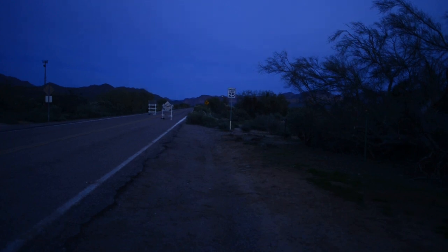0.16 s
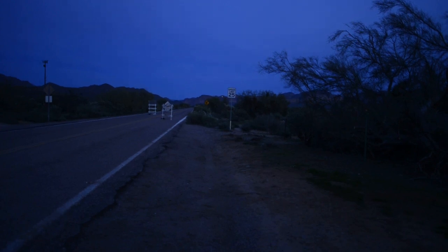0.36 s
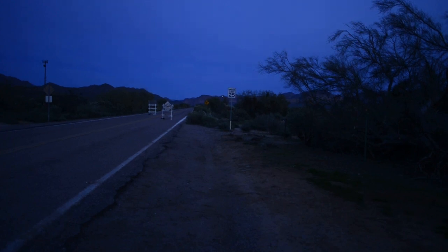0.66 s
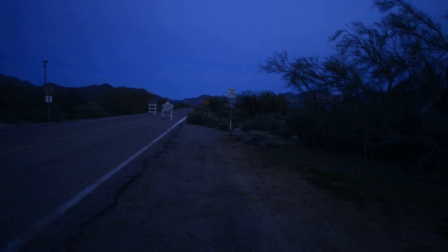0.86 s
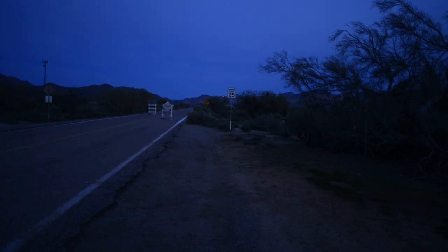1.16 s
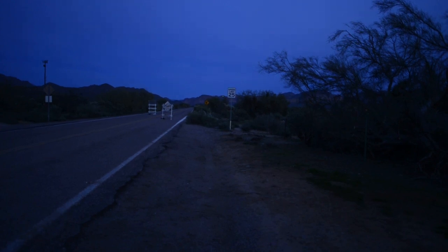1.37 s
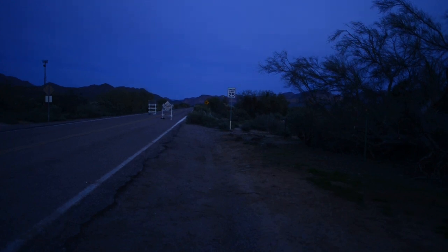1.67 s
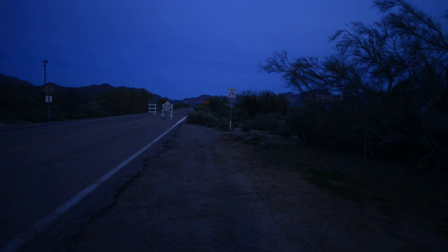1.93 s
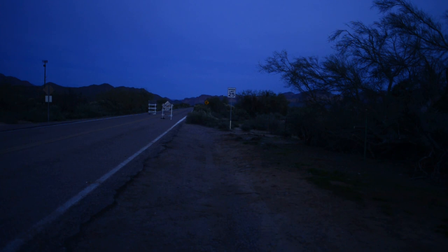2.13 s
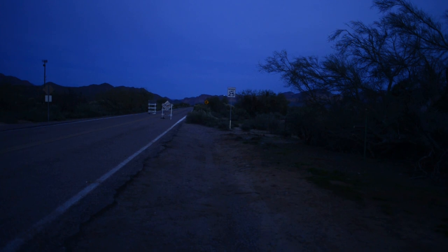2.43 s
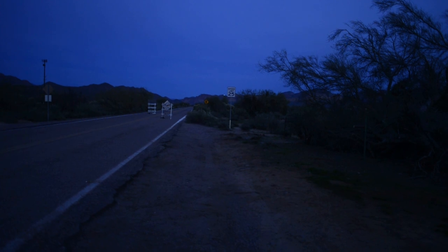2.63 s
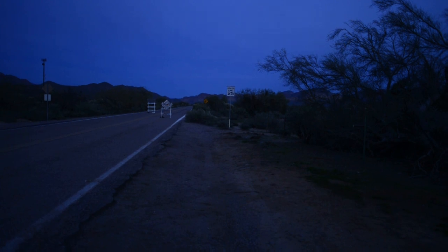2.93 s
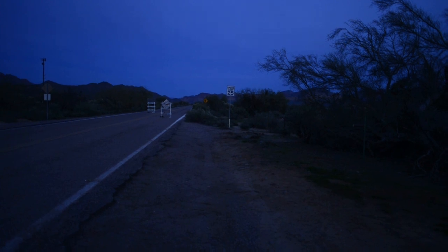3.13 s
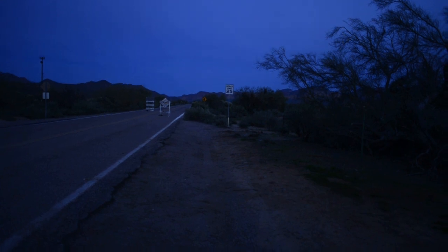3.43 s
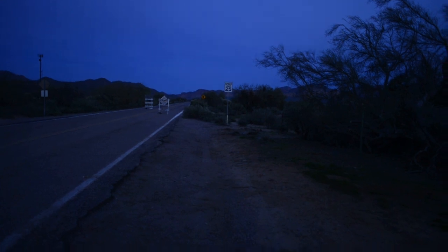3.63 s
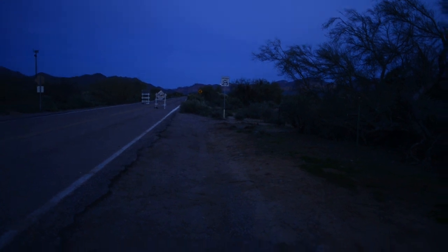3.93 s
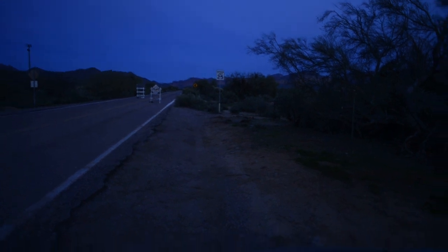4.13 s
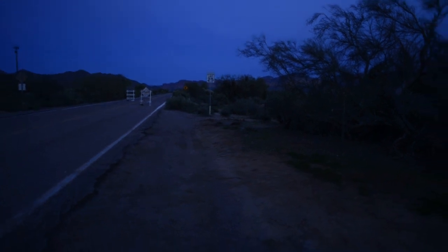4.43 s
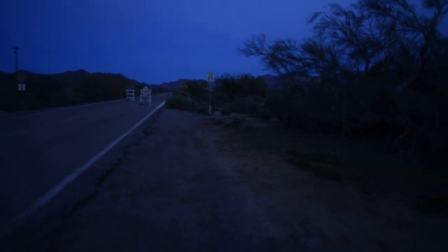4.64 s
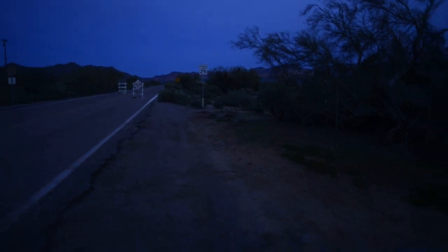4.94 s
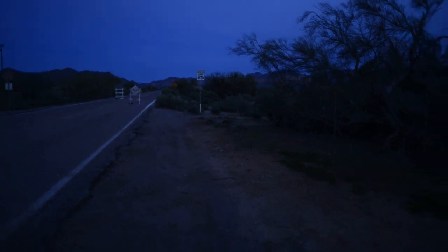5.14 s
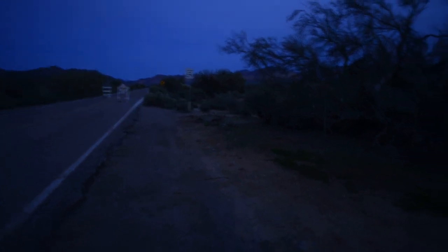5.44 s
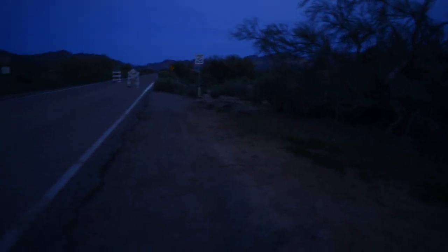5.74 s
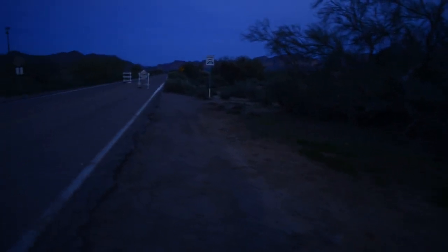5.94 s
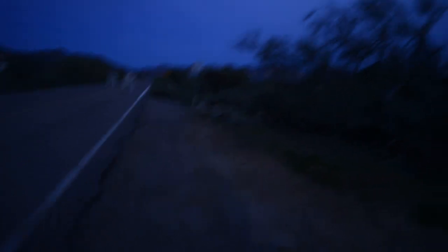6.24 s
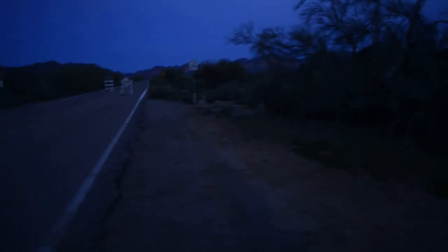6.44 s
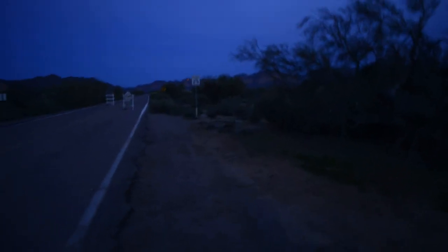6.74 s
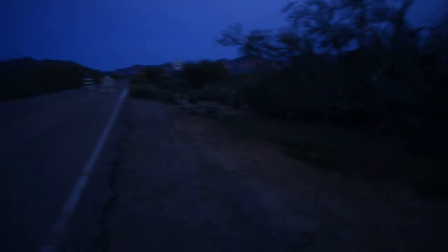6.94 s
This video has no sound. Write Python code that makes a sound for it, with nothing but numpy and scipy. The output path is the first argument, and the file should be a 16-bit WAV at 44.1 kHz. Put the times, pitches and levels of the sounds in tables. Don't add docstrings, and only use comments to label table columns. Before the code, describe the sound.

On a quiet desert roadside at dusk, over soft hiss and a far engine's low hum, a coyote some way off yips twice and breaks into a high, nearly pure, slowly sagging howl of about a second. Faint echoes return from hills. Then very close fingers rub, squeak and rattle the camera's plastic shell, with sharp clicks and one harsh clipped snap.

```python
import sys
import numpy as np
from scipy import signal
from scipy.fft import rfft, irfft, next_fast_len
from scipy.io import wavfile
from scipy.ndimage import uniform_filter1d, map_coordinates

SR = 44100
rng = np.random.default_rng(int(sys.argv[2]) if len(sys.argv) > 2 else 0)


def makeup_ratio(level_db):
    decades = np.asarray(level_db, float) / 20
    return 10 ** decades


def put_to_file(sound):
    columns = np.atleast_2d(sound).T
    safe = np.clip(columns, -1, 1)
    whole_steps = np.round(safe * 32767)
    wavfile.write(sys.argv[1], SR, whole_steps.astype(np.int16))


N = 312943
TIME = np.arange(N) / SR

# [t/s, f/Hz, level/dB]
FIRST_YIP = [
    (1.655, 535, -60),
    (1.666, 555, -31.5),
    (1.69, 584, -25),
    (1.702, 623, -29),
    (1.725, 653, -28.5),
    (1.746, 630, -26),
    (1.75, 700, -38),
    (1.765, 617, -36.5),
    (1.785, 583, -53.5),
]
# [t/s, f/Hz, level/dB]
SECOND_YIP = [
    (1.855, 434, -52.5),
    (1.875, 573, -28),
    (1.889, 614.5, -28.5),
    (1.93, 696, -33.5),
    (1.955, 673, -31),
    (2.005, 650, -35.5),
    (2.036, 714, -26),
    (2.043, 744, -31),
    (2.052, 960, -42.5),
]
# [t/s, f/Hz, level/dB]
HOWL_LEAP = [
    (2.039, 848, -51.5),
    (2.049, 1150, -24),
    (2.066, 1175, -24.5),
    (2.095, 1118, -25.5),
    (2.112, 1010, -34),
    (2.128, 1040, -34),
    (2.137, 1119, -20),
    (2.176, 1186, -21),
]
# [t/s, f/Hz, level/dB]
HOWL_HOLD = [
    (2.21, 1180, -22),
    (2.279, 1156, -22.5),
    (2.308, 1173, -21.5),
    (2.45, 1158, -24.5),
    (2.56, 1141, -21.5),
    (2.6, 1150, -21.5),
    (2.721, 1127, -23),
    (2.9, 1135, -26.5),
    (2.952, 1096, -24.5),
]
# [t/s, f/Hz, level/dB]
CRACK = [
    (2.947, 1089, -60),
    (2.957, 914, -46.5),
    (2.967, 795, -34.5),
    (2.977, 659, -42.5),
    (2.988, 700, -43),
    (3.0, 680, -62),
]
# [t/s, level/dB, half width/s]
CALL_DIPS = [(1.697, -2, 0.0055), (1.911, -1.5, 0.0072), (1.946, 1, 0.014), (1.969, -5, 0.0041),
             (1.979, 0, .008), (2.015, -6.5, 0.0072), (2.057, 4.5, 0.008), (2.1, -10, .003),
             (2.111, -5.5, 0.0035), (2.146, -2.5, 0.0044), (2.168, -2.5, 0.0072), (2.44, -3.5, 0.028),
             (2.525, 3, 0.013), (2.548, -2.5, 0.01), (2.928, -15, 0.009)]
# [t/s, level/dB, half width/s]
OCTAVE_DIPS = [(2.184, -7, 0.0088), (2.24, -2, .008), (2.325, -8, .035), (2.44, 6, 0.031),
               (2.502, -11.5, 0.011), (2.584, -4.5, 0.018), (2.686, -8.5, 0.02), (2.726, -12.5, .007),
               (2.78, -8.5, .012), (2.86, 6, 0.05)]
# [delay t/s, level/dB]
ROCK_SLAP = [
    (.094, -9),
]


def coyotes():
    yip_db = [-11.5, -0.5, -25.5, -31]
    yip = dict(breath_db=-21, waver_db=(2.5, 1.2), lift=0.0527)
    first = voice(FIRST_YIP, jitter=.016, hoarse_db=-17, overtone=(7, 6), bark_lag=.02,
                  shape_db=yip_db + [-40, -56], **yip)
    sixth_db = -8 - 150 * np.abs(TIME - 2.04)
    second = voice(SECOND_YIP, jitter=.008, hoarse_db=-20, overtone=(6, sixth_db), shape_db=yip_db, **yip)
    fourth_db = -23 - 28 * np.abs(TIME - 2.72)
    octave_db = -20 + 20 * np.log10(faltering(OCTAVE_DIPS))
    howl = voice(HOWL_LEAP + HOWL_HOLD, jitter=.0008, hoarse_db=-44, overtone=(4, fourth_db),
                 shape_db=[0.25, octave_db], waver_db=(.5, 1))
    crack = voice(CRACK, jitter=.012, hoarse_db=-10, overtone=(3, -20), breath_db=-18, shape_db=[-5, -0.5])
    slap = sum(makeup_ratio(db) * dulled(np.roll(crack, round(delay * SR)), 960) for delay, db in ROCK_SLAP)
    return faltering(CALL_DIPS) * (first + second + howl) + crack + slap


def voice(rows, jitter, hoarse_db, overtone=(2, -40), breath_db=-90, shape_db=(0,), waver_db=(0, 0),
          lift=0, bark_lag=0):
    hz, level_db = curves(rows)
    bark_db = 14 * np.exp(-np.abs(TIME - rows[1][0] - bark_lag) / 0.016)
    partials_db = []
    for k, db in enumerate(shape_db):
        waver = waver_db[k > 0] * wobble(30.03)
        partials_db.append(level_db + db + (k > 1) * bark_db + waver)
    partials_db[0] = partials_db[0] + lift * (hz - 620)
    phase = 2 * np.pi * np.cumsum(hz * (1 + jitter * wobble(120))) / SR
    shimmer = 1 + makeup_ratio(hoarse_db) * wobble(350)
    tone = sum(makeup_ratio(db) * np.sin((k + 1) * phase) for k, db in enumerate(partials_db))
    order, over_db = overtone
    tone = tone + makeup_ratio(partials_db[-1] + over_db) * np.sin(order * phase)
    throat = resonate(rng.standard_normal(N), [(1440, 970, -3.0), (2230, 430, -8.5)])
    puffs = 1 + np.cos(phase)
    breath = makeup_ratio(level_db + breath_db) * puffs * unit(dulled(throat, 1900))
    return during(rows) * (shimmer * np.sqrt(2) * tone + breath)


# [delay t/s, level/dB]
ROCK_ECHOES = [
    (0.021, -17),
    (.092, -23.5),
    (.19, -26),
    (0.269, -33.5),
]


def land(x):
    t = np.arange(SR) / SR
    tail = unit(rng.standard_normal(len(t)) * decay(t, 1.0)) * makeup_ratio(-20.5) / np.sqrt(len(t))
    for delay, db in ROCK_ECHOES:
        smear = rng.standard_normal(len(t)) * np.exp(-np.abs(t - delay) / .0005)
        tail = tail + makeup_ratio(db) * smear / np.linalg.norm(smear)
    echo = signal.fftconvolve(x, tail)[:N]
    echo = echo - resonate(echo, [(1140, 260, -3)])
    favoured = resonate(echo, [(700, 320, 0.06), (2170, 430, -1)])
    return makeup_ratio(-4) * echo + makeup_ratio(13.5) * favoured


# [t/s, f/Hz, level/dB]
FAR_CALL = [
    (1.48, 1158, -80),
    (1.496, 1186, -55.5),
    (1.555, 1190, -51),
    (1.582, 1175, -62),
    (1.597, 1150, -60),
    (1.615, 1140, -61),
    (1.633, 1147, -56),
    (1.66, 1138, -65),
]
# [delay t/s, level/dB]
HILL_ECHOES = [
    (0.983, -39),
    (1.098, -30.5),
    (1.3, -38.5),
]
# [t/s, level/dB, half width/s]
HILL_INTERFERENCE = [(3.225, 14.5, 0.03), (3.31, -17, 0.012), (3.34, 6, 0.011), (3.372, -12, 0.011),
                     (3.4, 7.5, 0.011), (3.42, -10, 0.012), (3.455, 6, 0.032), (3.5, -1, 0.0067),
                     (3.55, 7, 0.024), (3.6, -4, 0.0089), (3.63, 2, .02), (3.72, -6.5, 0.025),
                     (3.755, 4, .015), (3.785, -7, .007), (3.815, -1, .02), (3.857, -22, .009),
                     (3.885, 6.5, 0.02), (3.95, 1.5, .04), (4.05, 2, 0.018), (4.17, 8, 0.027)]


def distance():
    back = 0
    for delay, db in HILL_ECHOES:
        late = [(s + delay, hz, level_db + db) for s, hz, level_db in HOWL_HOLD]
        flutter = makeup_ratio(1.5 * wobble(35))
        back = back + flutter * during(late, fade=.03) * voice(late, jitter=.002, hoarse_db=-17)
    tremor = makeup_ratio(4.5 * np.cos(2 * np.pi * 55.5 * (TIME - FAR_CALL[1][0])))
    far_call = tremor * voice(FAR_CALL, jitter=.008, hoarse_db=-10)
    return far_call + faltering(HILL_INTERFERENCE) * back


# [f/Hz, width/Hz, level/dB]
PORT_MODES = [(2510, 500, 1.5), (3660, 750, 13)]
# [f/Hz, width/Hz, level/dB]
SHEEN_MODES = [(5230, 1300, -4), (6260, 2500, -25)]
# [f/Hz, width/Hz, level/dB]
SCUFF_MODES = [(620, 250, -8), (1150, 330, 0), (2330, 300, -6)]
# [f/Hz, width/Hz, level/dB]
SHELL_MODES = [(253, 60, -1), (406, 354, -2), (630, 570, -1.5)]
# [f/Hz, width/Hz, level/dB]
PANEL_MODES = [(291, 25, -2.5), (389, 27, 2), (510, 70, 3), (603, 33, 7.5), (730, 17, -5), (838, 34, 4),
               (1060, 90, -12)]
LOOSE_GRIP = [
    (4.861,),
    (5.4,),
]
# [t/s, length/s, first level/dB, last level/dB, hiss over it/dB]
PORT_RUBS = [(3.237, 0.033, -55, -58, -10), (3.306, 0.045, -55, -52.5, -12), (3.357, 0.046, -63, -62, -9),
             (3.401, 0.073, -55.5, -57, -13), (3.716, 0.44, -62, -57, -7), (4.189, 0.15, -55.5, -44.5, -23),
             (4.322, 0.26, -56, -48.5, -5.5), (4.529, 0.035, -33, -43, -13),
             (4.566, 0.099, -29.5, -44.5, -23), (4.676, 0.036, -58, -52, -5),
             (4.72, 0.064, -47.5, -53, -11), (4.79, 0.059, -48, -51.5, -15), (4.866, 0.23, -44, -51.5, -15),
             (5.126, 0.184, -51.5, -39, -16), (5.303, 0.045, -52, -27, -19),
             (5.363, 0.046, -45, -36.5, -20), (5.409, 0.38, -24, -39.5, -17.5),
             (5.797, 0.067, -47.5, -35.5, -13), (5.854, 0.011, -40, -41, -7), (5.881, 0.088, -45, -29, -15),
             (5.964, 0.099, -32, -41.5, -14), (6.051, 0.13, -29, -34.5, -18),
             (6.175, 0.049, -42, -27, -7.5), (6.236, 0.089, -21.5, -26, -9.5),
             (6.343, 0.11, -39, -59, -5.5), (6.454, 0.165, -59, -53.5, -5.5),
             (6.611, 0.063, -57, -46.5, -7), (6.678, 0.25, -56, -56, -2), (6.918, 0.11, -56.5, -52.5, -3.5),
             (7.035, 0.054, -56, -54.5, -4.5)]
# [t/s, length/s, first level/dB, last level/dB]
BUTTON_SCUFFS = [(3.2, 0.04, -59, -53), (3.31, 0.89, -72, -59), (4.22, .13, -56, -51),
                 (4.36, 0.165, -61, -50), (4.527, 0.099, -32.5, -33), (4.625, 0.049, -34, -37.5),
                 (4.715, 0.043, -46, -48), (4.795, 0.043, -45, -44), (4.98, 0.031, -32, -41.5),
                 (5.12, 0.15, -57, -44), (5.34, 0.039, -29, -60), (5.27, .07, -53, -63),
                 (5.385, 0.031, -62, -53), (5.413, 0.11, -28.5, -44), (5.53, 0.32, -42.5, -57),
                 (5.85, 0.32, -54.5, -53), (6.055, 0.036, -56, -54), (6.15, 0.085, -54, -44.5),
                 (6.345, 0.17, -48.5, -55), (6.5, 0.23, -54, -54.5), (6.75, 0.28, -60.5, -54),
                 (7.05, 0.036, -54, -51)]
# [t/s, length/s, first level/dB, last level/dB]
PALM_PRESSES = [(3.2, 1.01, -64.5, -56.5), (4.312, 0.21, -49.5, -43.5), (4.535, 0.17, -38, -42.5),
                (4.7, .15, -55, -43.5), (4.858, 0.038, -28, -22.5), (4.902, 0.071, -25, -28.5),
                (4.99, 0.063, -30, -32.5), (5.065, 0.042, -32, -27), (5.118, 0.038, -32, -27.5),
                (5.163, 0.092, -35, -28), (5.26, 0.098, -42, -41), (5.342, 0.059, -38, -55),
                (5.413, 0.076, -33.5, -36), (5.53, 0.29, -50, -62), (5.93, 0.28, -60, -59),
                (6.18, 0.2, -54, -55.5), (6.35, 0.43, -66, -57.5), (6.8, 0.23, -59.5, -52.5)]


def rubbing():
    port = resonate(grains(3500, spread_db=2.4, clump_db=1.2), PORT_MODES)
    port = unit(dulled(port, 5200))
    port = highpassed(port, 2200)
    sheen = resonate(grains(4000, spread_db=4, clump_db=2.5), SHEEN_MODES)
    sheen = unit(dulled(resonate(sheen, [(5550, 3400, 0)]), 10200))
    rub = strokes([row[:-1] for row in PORT_RUBS]) * port + strokes(raised(PORT_RUBS)) * sheen
    buttons = resonate(grains(1500, spread_db=3, clump_db=2), SCUFF_MODES)
    buttons = resonate(buttons, [(650, 500, -2), (1280, 650, 0), (2330, 550, 1)])
    scuff = strokes(BUTTON_SCUFFS) * unit(dulled(buttons, 3200))
    push = grains(3000, spread_db=3.0, clump_db=1.5)
    loose = during(LOOSE_GRIP)
    free = unit(makeup_ratio(8.0) * resonate(push, SHELL_MODES) + resonate(push, PANEL_MODES))
    firm = unit(resonate(push, SHELL_MODES[1:]))
    boom = loose * free + (1 - loose) * firm
    return rub + scuff + strokes(PALM_PRESSES) * dulled(boom, 1035)


# [f/Hz, width/Hz, level/dB]
SQUEAL_MODES = [(1220, 530, 0), (2360, 680, -9), (3550, 250, -11), (5000, 430, -11.5)]
# [t/s, length/s, first level/dB, last level/dB, upper modes over it/dB]
BUTTON_SQUEAKS = [
    (4.525, 0.046, -32, -33, -3),
    (4.561, 0.058, -43, -33.5, -3.5),
    (4.631, .043, -38, -43, -11.5),
    (5.43, 0.038, -40, -46.5, -4),
    (5.484, 0.014, -38, -48, -5),
    (5.51, 0.095, -54, -56, -6),
    (5.952, 0.044, -57, -58, -15),
    (6.077, 0.047, -63, -62, -15),
]
# [f/Hz, width/Hz, level/dB]
WHINE_MODE = [(1250, 150, 0)]
# [t/s, length/s, first level/dB, last level/dB]
BUTTON_WHINES = [
    (5.377, 0.0085, -38, -46),
    (5.418, 0.02, -24, -34),
    (5.45, 0.022, -44, -44),
    (5.482, 0.0096, -34, -36),
    (5.505, 0.02, -43, -47),
    (5.54, .01, -39, -43),
    (5.562, 0.016, -46, -40),
]


def squeaks():
    drag = grains(2000, spread_db=1.5, clump_db=2)
    low, high, whine = [unit(resonate(resonate(drag, modes), modes))
                        for modes in (SQUEAL_MODES[:1], SQUEAL_MODES[1:], WHINE_MODE)]
    low = strokes([row[:-1] for row in BUTTON_SQUEAKS]) * low
    high = strokes(raised(BUTTON_SQUEAKS)) * makeup_ratio(1.5) * high
    return strokes(BUTTON_WHINES) * whine + low + high


# [t/s, level/dB, f/Hz, knock over it/dB]
SHELL_TICKS = [(3.491, -36.5, 3700, -9), (3.699, -37.5, 3860, -9), (3.855, -38.5, 3660, -4),
               (3.939, -35, 3946, -19), (3.989, -26, 4530, -14), (3.9992, -26.5, 3520, 2),
               (4.017, -28.5, 3570, -2), (4.2886, -37, 4040, 0), (4.317, -23.5, 3550, -25),
               (4.3291, -25.5, 3440, -22), (4.3452, -29, 3580, -11), (4.719, -32, 3570, 4),
               (4.739, -34, 3780, 7), (4.7502, -30, 3400, 7), (4.808, -28, 3630, 6), (4.845, -31, 3700, 8),
               (4.78, -33, 3960, 8), (4.799, -31, 3550, 9), (4.8598, -14, 4800, 13),
               (4.8628, -18, 4450, 9.5), (4.901, -19, 3700, 10), (4.934, -32, 4800, -5),
               (4.9918, -13, 4720, -3), (5.026, -29, 3870, -5), (5.4147, -14, 4230, -14),
               (4.9754, -27.5, 4560, -11), (5.217, -10.5, 3840, -15), (5.3113, -23, 3780, -10),
               (5.377, -19, 3610, 5), (6.435, -37, 5500, -15), (6.618, -37, 5500, -15),
               (6.683, -37, 2580, 3)]
# [t/s, level/dB, f/Hz, top over it/dB]
NAIL_CLICKS = [(5.34, -20, 3230, -34), (5.345, -18, 3200, -32), (5.3495, -4, 3660, -48),
               (5.701, -21, 3720, -29), (5.8586, -21.5, 3940, -31), (5.8774, -15.5, 4350, -33),
               (6.031, -25.5, 4300, -25.5), (6.0626, -14.5, 3770, -29), (6.2274, -21.5, 3550, -29),
               (6.2342, -15, 3950, -26), (6.2733, -20, 3660, -25), (6.339, -22, 3880, -30),
               (6.8881, -21.5, 4100, -34), (6.888, -21, 5600, -26), (5.4093, -29, 3200, -30),
               (5.5575, -29, 3530, -32), (5.5844, -18, 3890, -33), (5.83, -34, 3680, -30),
               (6.0583, -25, 3600, -30), (6.2405, -24, 3900, -30), (6.2548, -19, 3680, -30),
               (6.264, -22, 3670, -30), (6.269, -27, 3600, -28), (6.298, -21, 3730, -22),
               (6.3012, -26, 3850, -26)]
# [t/s, level/dB, f/Hz]
DULL_TAPS = [(4.474, -27.5, 595), (4.501, -31, 620), (4.725, -31, 660), (4.747, -43, 715),
             (4.807, -31, 608), (5.289, -30, 1460), (5.302, -30.5, 1600), (5.413, -8, 647),
             (5.4141, -17, 1250), (5.349, -20, 1060), (4.0173, -37, 1495), (5.585, -17, 1420),
             (5.673, -25, 1220), (5.688, -25, 2100), (5.706, -35, 1790), (5.745, -36, 1300),
             (6.049, -34, 1021), (6.434, -28.5, 1100), (6.451, -36, 1110), (6.503, -36, 1210),
             (6.772, -39, 1370), (6.99, -34, 1440)]


def impacts():
    bright, knock, top = parts = np.zeros((3, N + SR))
    t = np.arange(SR // 8) / SR
    hits = [(*row, -28.5, 0.013) for row in SHELL_TICKS]
    hits += [(s, db, hz, -38, top_db, 0.013) for s, db, hz, top_db in NAIL_CLICKS]
    hits += [(*row, -1, -42.5, 0.014) for row in DULL_TAPS]
    for s, db, hz, knock_db, top_db, t60 in hits:
        noise = rng.standard_normal((3, len(t)))
        ring = decay(t, t60) * np.sin(2 * np.pi * hz * t)
        crack = signal.lfilter(*signal.iirpeak(hz, .9, SR), 0.98 * decay(t, 0.014) * noise[2])
        place(bright, s, makeup_ratio(db - 2.0) * (ring + crack))
        place(knock, s, makeup_ratio(db + knock_db + 10.5) * decay(t, 0.0077) * noise[0])
        place(top, s, makeup_ratio(db + top_db + 7.0) * decay(t, 0.0069) * noise[1])
    return parts


# [t/s, level/dB, f/Hz, length/s]
LOOSE_RATTLES = [
    (4.859, -9, 4170, 0.0076),
    (4.905, -12, 5000, 0.0096),
    (4.995, -15, 4760, 0.0086),
    (5.025, -38, 3800, 0.017),
    (5.066, -11.5, 4670, 0.0086),
    (5.116, -20.5, 4260, 0.01),
    (5.121, -15.5, 3650, 0.01),
    (5.163, -13, 3630, 0.0066),
    (5.195, -22.5, 3130, 0.011),
    (5.222, -18, 3400, 0.011),
]


def rattles():
    bright, knock, top = parts = np.zeros((3, N + SR))
    t = np.arange(SR // 8) / SR
    for s, db, hz, length in LOOSE_RATTLES:
        noise = rng.standard_normal((4, len(t)))
        clump = np.exp(-(t / length - .5) ** 2) * makeup_ratio(3 * unit(uniform_filter1d(noise[0], size=60)))
        clump = clump + 0.11 * decay(t, 0.16)
        crackle = signal.lfilter(*signal.iirpeak(hz, 1.3, SR), clump * noise[1])
        place(bright, s, makeup_ratio(db) * crackle / np.abs(crackle).max())
        thump_hz = 269 * (1 + 0.061 * noise[0, 0])
        place(bright, s, makeup_ratio(db - 7) * decay(t, 0.068) * np.sin(2 * np.pi * thump_hz * t))
        sag_hz = (401 + (950 - 401) * np.exp(-t / 0.0249)) * (1 + .08 * noise[0, 1])
        sag = np.sin(2 * np.pi * np.cumsum(sag_hz) / SR)
        flutter = unit(uniform_filter1d(uniform_filter1d(noise[3], size=200), size=200))
        swell = (1 - np.exp(-t / .006)) * (1 + 0.35 * flutter)
        place(bright, s, makeup_ratio(db - 13.5) * decay(t, .16) * swell * sag)
        place(knock, s, makeup_ratio(db - 8 + 10.5) * decay(t, 0.22) * noise[2])
        place(top, s, makeup_ratio(db - 28.5 - 9.0) * dulled(clump * noise[3], 9000))
    return parts


def contacts():
    bright, knock, top = (impacts() + rattles())[:, :N]
    thud = dulled(resonate(knock, SHELL_MODES + [(1262, 920, -5.0)]), 3400)
    air = dulled(resonate(top, [(7650, 1600, -4.0), (11400, 11000, -5.0)]), 13000)
    return dulled(bright, 5230) + thud + air


# [t/s, level/dB, f/Hz, t60/s]
HARD_SNAPS = [
    (4.8602, -1, 3300, .007),
    (4.8611, 3, 5000, .01),
    (4.8628, -7, 4900, .012),
    (6.2283, 10.5, 3450, .0085),
    (6.2283, -2, 4750, .008),
    (6.2295, -10, 2750, .012),
    (6.2284, -15, 1560, .01),
]


def snaps():
    out = np.zeros(N + SR)
    t = np.arange(SR // 20) / SR
    for s, db, hz, t60 in HARD_SNAPS:
        onset = 1 - np.exp(-t / .00015)
        place(out, s, makeup_ratio(db) * decay(t, t60) * np.sin(2 * np.pi * hz * t) * onset)
    return out[:N]


# [f/Hz, level/dB per Hz]
HISS_SPECTRUM = [(12, -54), (22, -37), (43, -1.5), (120, -3.5), (220, -5.5), (390, -9.5), (700, -9.5),
                 (1300, -15.5), (3500, -20), (6000, -23.5), (10000, -26.5), (14000, -27), (16000, -28.5)]
# [t/s, level/dB]
ROAD_WASH = [
    (0, -67.5),
    (1.3, -58.5),
    (2.4, -61.5),
    (4.2, -59),
    (5.7, -61.5),
    (7.1, -62),
]
# [t/s, f/Hz, level/dB, f/Hz, level/dB]
ENGINE_ORDERS = [
    (0, 92.6, -66.5, 142, -61.5),
    (.9, 94.4, -71.5, 142.6, -60.5),
    (3.85, 96.2, -64.5, 140.7, -53.5),
    (5.4, 98.4, -58, 143.9, -55),
    (7.1, 99.4, -63, 145.8, -54),
]


def night():
    f, db = np.transpose(HISS_SPECTRUM)
    shape = lambda hz: makeup_ratio(np.interp(np.log(hz + 1), np.log(f), db))
    hiss = unit(filtered(rng.standard_normal(N), shape))
    wash = unit(resonate(rng.standard_normal(N), [(240, 130, -0.5), (700, 240, -8.0)]))
    wash_gain = makeup_ratio(curves(ROAD_WASH)[0] - 3.0 + 0.64 * wobble(5.6))
    low_hz, low_db, high_hz, high_db = curves(ENGINE_ORDERS)
    engine = engine_tone(low_hz, low_db + 5.5) + engine_tone(high_hz, high_db + 0.5)
    engine = engine + engine_tone(2 * high_hz, high_db - 13.0) + engine_tone(55, -68.0)
    return makeup_ratio(-54.0) * hiss + wash_gain * wash + engine


def engine_tone(hz, db):
    gain = makeup_ratio(db + 0.76 * wobble(6.6))
    return gain * np.sin(2 * np.pi * np.cumsum(hz * (1 + 0.00788 * wobble(5.6))) / SR)


def circuits():
    frame = TIME * 33.0 % 1
    gate = sum(np.exp(-.5 * ((frame - centre) / 0.078) ** 2) for centre in (.1, .38, .67))
    bursts = resonate(gate * rng.standard_normal(N), [(4040, 190, -11.0), (5090, 440, -18.0)])
    return makeup_ratio(-67.0) * unit(bursts)


def grains(rate, spread_db, clump_db):
    draw = rng.random((2, N))
    sizes = makeup_ratio(-spread_db * np.log(draw[1] + 0.045)) * rng.standard_normal(N)
    slips = (draw[0] < rate / SR) * sizes
    return unit(unit(slips) + .5 * rng.standard_normal(N)) * makeup_ratio(clump_db * wobble(60))


def strokes(rows):
    gain = np.zeros(N)
    grip_s, release_db_per_s = 0.0044, 893
    for s, length, first_db, last_db in rows:
        span = slice(int(s * SR), int((s + length + .1) * SR))
        u = TIME[span] - s
        db = np.interp(u, [0, length], [first_db, last_db])
        db = db - release_db_per_s * np.clip(u - length, 0, None)
        gain[span] += makeup_ratio(db) * np.clip(u / grip_s, 0, 1)
    return gain


def raised(rows):
    return [(s, length, first_db + db, last_db + db) for s, length, first_db, last_db, db in rows]


def faltering(rows):
    return makeup_ratio(sum(db * np.exp(-((TIME - s) / width) ** 2) for s, db, width in rows))


def during(rows, fade=0.0045):
    return np.clip(np.minimum(TIME - rows[0][0], rows[-1][0] - TIME) / fade, 0, 1)


def curves(rows):
    s, *cols = np.transpose(rows)
    return [np.interp(TIME, s, c) for c in cols]


def wobble(rate):
    knots = rng.standard_normal(int(N * rate / SR) + 4)
    return map_coordinates(knots, [np.arange(N) * rate / SR])


def decay(t, t60):
    return makeup_ratio(-60 * t / t60)


def place(out, s, sound):
    out[round(s * SR):][:len(sound)] += sound


def unit(x):
    return x / np.sqrt(np.mean(x ** 2) + 1e-20)


def filtered(x, response):
    m = next_fast_len(N + SR // 2)
    return irfft(rfft(x, m) * response(np.fft.rfftfreq(m, 1 / SR)), m)[:N]


def resonate(x, modes):
    def response(f):
        total = 0
        for k, (centre, width, db) in enumerate(modes):
            damping = 1j * f * width
            total = total + (-1) ** k * makeup_ratio(db) * damping / (centre * centre - f * f + damping)
        return total
    return filtered(x, response)


def dulled(x, hz):
    return signal.sosfilt(signal.butter(4, hz, fs=SR, output="sos"), x)


def highpassed(x, hz):
    return signal.sosfilt(signal.butter(4, hz, "highpass", fs=SR, output="sos"), x)


def scene():
    call = coyotes()
    hand = rubbing() + contacts() + squeaks() + snaps()
    hand = highpassed(hand, 185)
    return (call + land(call) + distance() + hand + night() + circuits())[None]


def band_limit(x):
    return signal.sosfilt(signal.butter(12, 15830, fs=SR, output="sos"), x)


def record(dry):
    clipped = np.clip(dry[0], -1, 1)
    mix = filtered(clipped, lambda hz: hz < 15800)[None]
    return band_limit(mix)


dry = scene()
out = record(dry)
put_to_file(out)
```